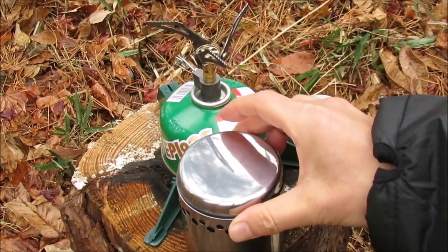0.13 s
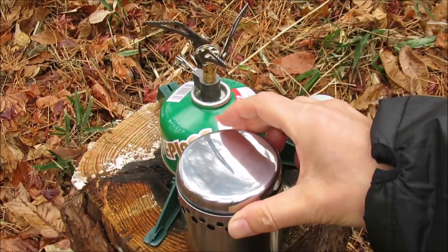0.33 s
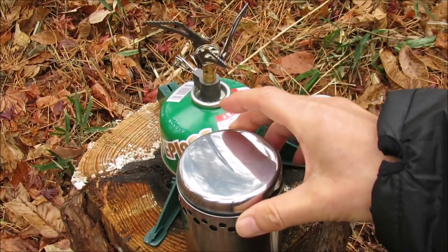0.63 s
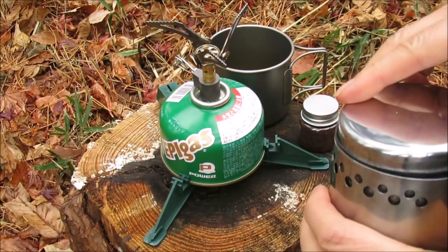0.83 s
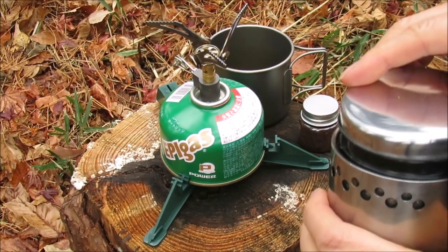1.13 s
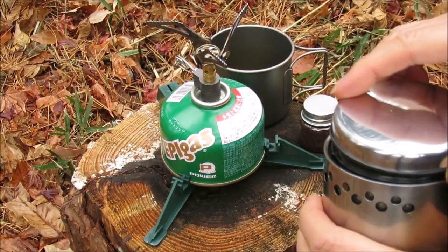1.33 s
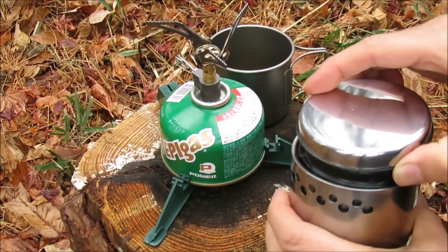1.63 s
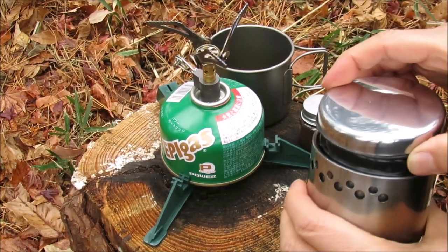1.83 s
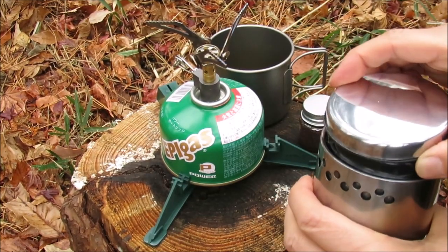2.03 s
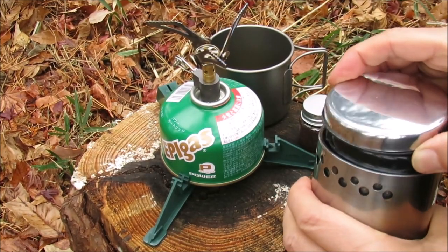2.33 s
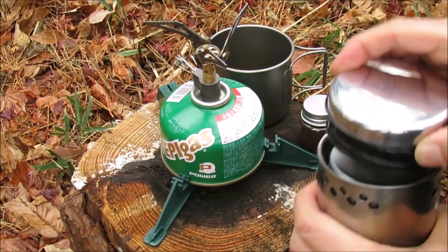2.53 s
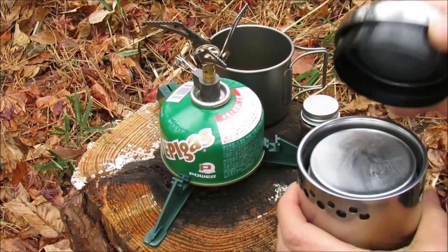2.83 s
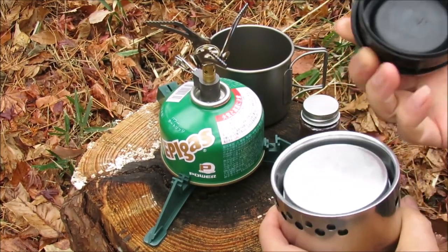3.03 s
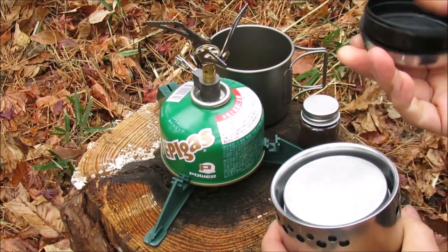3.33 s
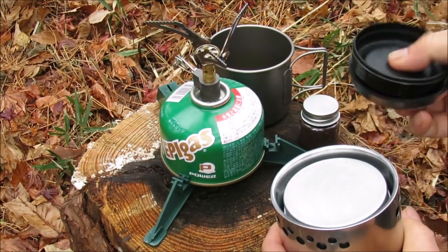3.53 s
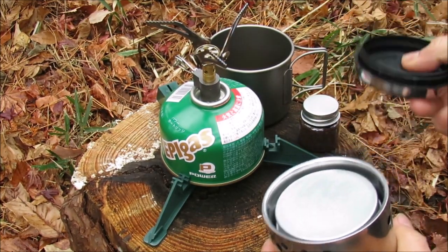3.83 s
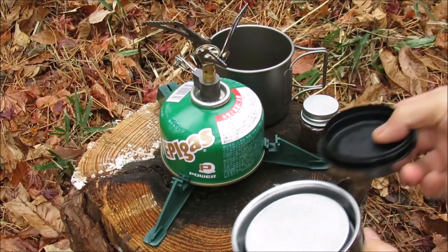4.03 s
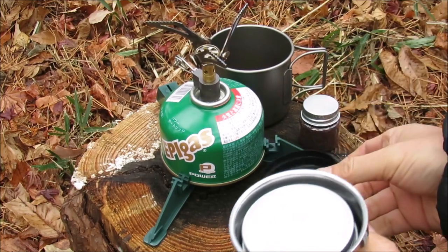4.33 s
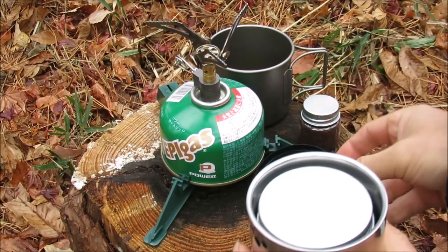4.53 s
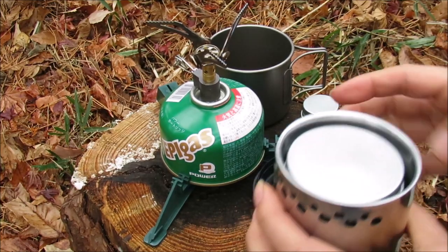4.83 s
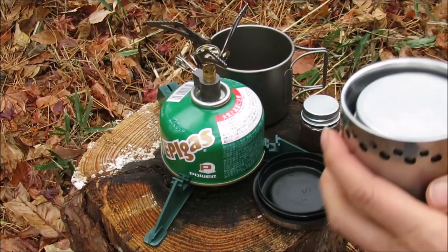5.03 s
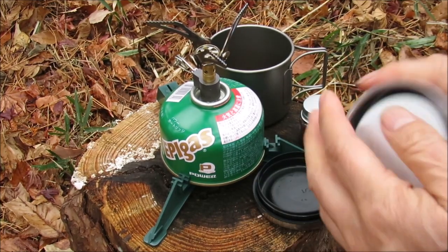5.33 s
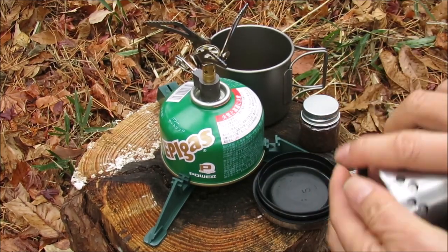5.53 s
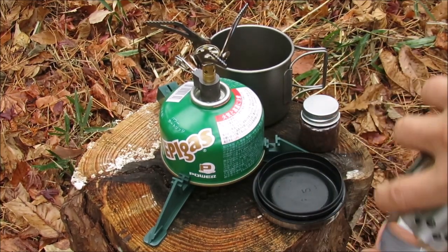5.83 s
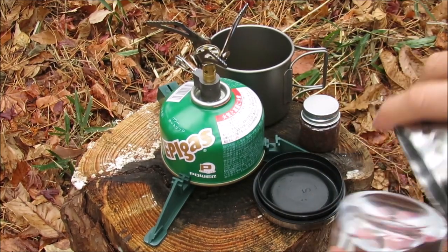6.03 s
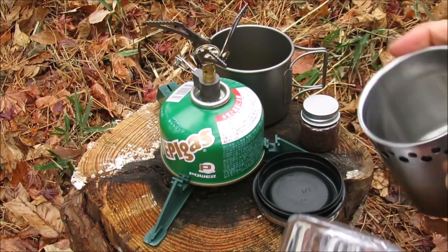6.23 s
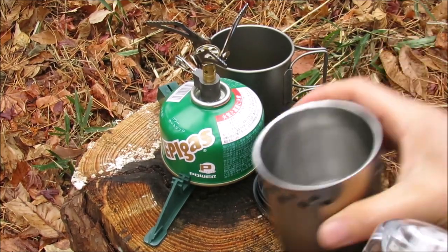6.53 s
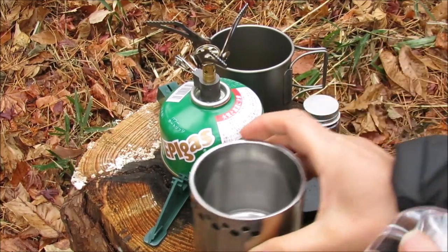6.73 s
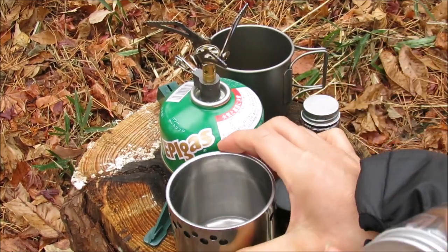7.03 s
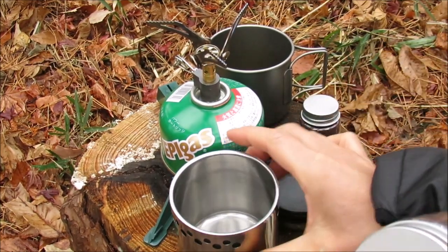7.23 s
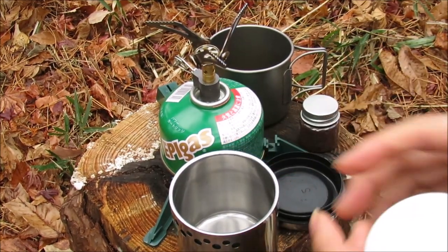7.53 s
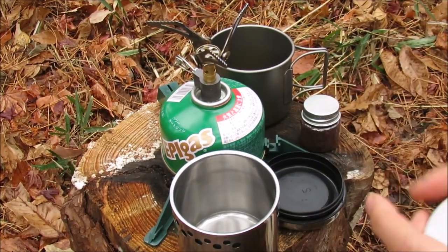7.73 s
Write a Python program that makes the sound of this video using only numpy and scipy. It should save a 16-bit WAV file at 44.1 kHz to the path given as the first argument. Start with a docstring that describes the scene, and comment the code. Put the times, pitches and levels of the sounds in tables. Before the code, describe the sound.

In a quiet wood with distant traffic rumble and sparse thin birdsong, hands open a metal mug right beside the microphone, slightly to the right. Faint taps and jacket rustle lead to crisp popping of a thin lid, two bright clacks as it is set down, then a hissy drag and a scatter of steel clinks. A hollow mug knock and small last clinks follow, nearly dry, with only faint echoes.

```python
"""Opening a steel camping mug in a wood

A thin lid is twisted off and pops as the thumb flexes it: bent panels and ringing modes, with cracks and thuds.
It is set on a stump; nested cups knock and slide apart: blows and slips on ringing steel, with treble hiss.
A nylon sleeve swishes in shaped noise; wavering whistles make far birds over a low wash of wind and traffic.
A camera close by hears the near sounds slightly to the right and turns down after loud sounds.
"""
import sys
import numpy as np
from scipy import signal
from scipy.fft import rfft, irfft, next_fast_len
from scipy.io import wavfile
from scipy.ndimage import uniform_filter1d

SR = 44100
rng = np.random.default_rng(int(sys.argv[2]) if len(sys.argv) > 2 else 0)


def wav_out(sig):
    """Save sig, one row per channel (or a flat mono array), as 16-bit PCM at SR to the path in sys.argv[1]."""
    wavfile.write(sys.argv[1], SR, np.round(np.clip(np.atleast_2d(sig).T, -1, 1) * 32767).astype(np.int16))


N = 347949  # length in samples

# How busily the arms and hands move: (t/s, sleeve swish level/dB)
MOVING = [(0, -60), (.6, -64.5), (1.2, -57.5), (1.4, -60), (1.6, -47), (1.85, -62.5), (2.35, -79),
          (2.57, -51.5), (2.75, -61.5), (2.95, -51), (3.2, -59.5), (3.702, -53), (3.949, -57), (4.5, -59.5),
          (5.05, -48.5), (5.45, -55.5), (5.75, -46.5), (6.0, -57), (6.42, -46.5), (6.8, -60.5), (7.3, -65),
          (7.62, -46), (7.89, -62.5)]
# Likeness of the left and right background noise: (f/Hz, likeness from -1 to 1)
SAME = [(60, 1), (130, 0.8), (290, 0.36), (640, -0.12), (1410, 0.11), (3100, -0.31), (6820, -0.54),
        (15000, -1.04)]
UPPER_PANEL = 1.61  # pitch of the second panel on knocks, as a ratio to the first


def gain_of(db):
    """Turns decibels into a plain multiplier."""
    return 10 ** (np.asarray(db) / 20)


def evened(x):
    """Scales a signal to an average strength (RMS) of one."""
    return x / np.sqrt(np.mean(x ** 2) + 1e-20)


def read(points, hz):
    """Reads a curve at any frequency, on a logarithmic frequency scale."""
    f, value = np.transpose(points)
    return np.interp(np.log(hz + 1), np.log(f + 1), value)


def level(curve):
    """Draws a gain over the whole scene from (t/s, level/dB) points."""
    return gain_of(np.interp(np.arange(N) / SR, *np.transpose(curve)))


def add(mix, s, sound):
    """Adds a sound into the mix, starting at s seconds."""
    part = mix[round(s * SR):][:len(sound)]
    part += sound[:len(part)]


def noise(colour, same, patchy_db, flicker_db, size=512):
    """Two channels of random short-time spectra with drifting patches and a flicker shared by all bands."""
    frames = 4 * N // size + 5
    hz = np.fft.rfftfreq(size, 1 / SR)
    a, b, c, d, patches = rng.standard_normal((frames, len(hz), 5)).T
    patches = uniform_filter1d(patches, size=8, axis=0)  # smooth over frequency
    patches = evened(uniform_filter1d(patches, size=10000 // size, axis=1))  # and over time
    flicker = evened(uniform_filter1d(rng.standard_normal(frames), size=3))
    likeness = np.clip(same(hz), -1, 1)[:, None]
    left = a + 1j * b
    right = likeness * left + np.sqrt(1 - likeness ** 2) * (c + 1j * d)
    spectra = np.array([left, right])
    spectra *= gain_of(read(colour, hz)[:, None] + patchy_db * patches + flicker_db * flicker)
    return evened(signal.istft(spectra, nperseg=size, noverlap=3 * size // 4)[1][:, :N])


def background_likeness(hz):
    """Makes low background noise alike on both sides and high noise more different or opposed."""
    return read(SAME, hz)


def scatter(x, t60, first):
    """Sparse taps of random sign, dying away; other taps in each channel."""
    taps = np.zeros((2, round(SR * .4)))
    at = np.arange(first, taps.shape[1] - 20, 20)
    at = at + rng.integers(0, 20, (2, len(at)))
    tap_gain = rng.choice([-1., 1.], at.shape) * gain_of(-60 * at / SR / t60)
    np.put_along_axis(taps, at, tap_gain, 1)
    return signal.fftconvolve(x[None], taps / np.linalg.norm(taps[0]), axes=1)[:, :N]


def from_right(x, lag, pan_db):
    """A source on the right reaches the left port later (lag in samples) and weaker."""
    size = next_fast_len(N)
    delay = np.exp(-2j * np.pi * np.fft.rfftfreq(size) * lag)
    late = irfft(rfft(x[0], size) * delay, size)[:N]
    return np.array([late * gain_of(pan_db / 2), x[-1] * gain_of(-pan_db / 2)])


def ringing(modes, hz, reach_db, bend=0, uneven_db=0):
    """An object rings freely, strongest in modes near hz; a grip that bends it detunes each mode."""
    t = np.arange(SR // 6) / SR
    mode_hz, mode_db, mode_t60 = np.array(modes).T[:, :, None]
    phase, shift, share = rng.uniform(-0.98, 1, (3, *mode_hz.shape))
    octaves_away = abs(np.log2(mode_hz / hz))
    near_db = mode_db - reach_db * octaves_away + uneven_db * share
    turns = mode_hz * (1 + bend * shift) * t + phase
    return (gain_of(near_db - 60 * t / mode_t60) * np.sin(2 * np.pi * turns)).sum(0)


def blows(rows, modes, reach_db, flex, crack_t60, crack_top_hz, rise, upper_db=-60, settle=99, **grip):
    """Each blow flexes two panels, rings the modes nearest its pitch, cracks in the treble and thuds."""
    # Hand and stump give under a blow: (f/Hz, level/dB, time to fall 60 dB/s)
    stump_modes = [(125, -11.5, 0.077), (210, -8.5, .04), (278, -1.5, .035), (404, -3, 0.016),
                   (556, -10, 0.024), (707, -10, 0.025)]
    linger_t60 = 0.054  # s; a flexed panel rings on at its own pitch
    out, t = np.zeros(N), np.arange(SR // 6) / SR
    treble = signal.butter(3, [2100, min(crack_top_hz, 16000)], "band", fs=SR, output="sos")
    for s, db, hz, upper_hz, crack_db, thud_db, linger_db, ring_db in rows:
        # the second panel slides towards the pitch of the first within about settle seconds
        upper_turns = hz * t + (upper_hz - hz) * settle * (1 - np.exp(-t / settle))
        first_panel = np.sin(2 * np.pi * hz * t)
        wave = first_panel + gain_of(upper_db) * np.sin(2 * np.pi * upper_turns)
        panel = (t * hz / flex * np.exp(1 - t * hz / flex)) ** 2 * wave  # swells for flex cycles
        linger = gain_of(linger_db - 60 * t / linger_t60) * first_panel
        thud = gain_of(thud_db) * ringing(stump_modes, hz, reach_db=0, bend=.08, uneven_db=3.0)
        hiss = evened(signal.sosfilt(treble, rng.standard_normal(len(t))))
        crack = gain_of(crack_db - 60 * t / crack_t60) * hiss
        ring = gain_of(ring_db) * ringing(modes, hz, reach_db, **grip)
        onset = (1 - np.exp(-t / rise)) ** 2
        add(out, s, gain_of(db) * (panel + onset * (ring + linger + thud + crack)))
    return out


def paired(rows, *more):
    """Gives each knock its second panel."""
    return [(s, db, hz, UPPER_PANEL * hz, *rest, *more) for s, db, hz, *rest in rows]


def scrapes(rows, modes, reach_db):
    """Uneven slips keep the metal ringing while it rubs; a separate grit sound adds bare grating."""
    out, body = np.zeros(N), signal.butter(2, [800, 7500], "band", fs=SR, output="sos")
    for s, length, db, hz, grit_db in rows:
        count = round(length * SR)
        rubbing = rng.standard_normal(count) * rng.exponential(1, count)
        rubbing *= signal.windows.tukey(count, .5)
        rung = signal.fftconvolve(rubbing, ringing(modes, hz, reach_db))
        add(out, s, gain_of(db) * evened(rung))
        add(out, s, gain_of(db + grit_db) * evened(signal.sosfilt(body, rubbing)))
    return out


def strokes(rows):
    """Each stroke of sound swells and fades; powers add."""
    power = np.zeros(N + SR)
    for s, length, db in rows:
        add(power, s - length / 2, gain_of(2 * db) * np.hanning(round(length * SR)) ** 2)
    return np.sqrt(power[:N])


def grainy(x, per_s, depth):
    """Gives a noise a rough grain: short random surges that fade quickly."""
    catches = (rng.random(N) < per_s / SR) * np.minimum(rng.exponential(1, N), 2)
    surges = signal.lfilter([1], [1, -np.exp(-1 / (0.0074 * SR))], catches)  # each fades over 7.4 ms
    return x * evened(1 + depth * surges)


def wood_air():
    """The steady broad background of the wood is random noise, strongest in the bass."""
    # Tone of the air: (f/Hz, relative level per Hz/dB)
    air_colour = [(12, -71.5), (20, -17), (53, -1.5), (177, -11.5), (234, -10.5), (270, -8.5), (377, -18),
                  (459, -16), (1190, -18.5), (1370, -18), (4420, -27), (12800, -42.5), (16000, -76.5)]
    air = noise(air_colour, background_likeness, patchy_db=1.5, flicker_db=.8, size=2048)
    return gain_of(-49.5) * air


def low_wash():
    """A low wash is noise mostly between 150 and 450 Hz that slowly rises and falls."""
    # Tone of the wash: (f/Hz, relative level per Hz/dB)
    wash_colour = [(60, -23.5), (150, -6.5), (300, 2), (450, 0), (600, -29.5), (1000, -53)]
    # Rise and fall: (t/s, level/dB)
    wash_level = [(0, -52.5), (1.25, -53), (1.45, -58.5), (2.2, -59), (3.1, -55), (3.8, -59.5), (4.6, -55),
                  (5.1, -60), (6, -53.5), (6.6, -58), (7.2, -60.5), (7.89, -59.5)]
    return level(wash_level) * noise(wash_colour, background_likeness, patchy_db=1.2, flicker_db=.4)


def traffic_rumble():
    """Distant traffic is a narrow deep noise around 50 Hz that slowly rises and falls."""
    # Tone of the rumble: (f/Hz, relative level per Hz/dB)
    rumble_colour = [(20, -25.5), (38, -9), (50, 8.5), (62, -10), (100, -10.5), (130, -28.5)]
    # Rise and fall: (t/s, level/dB)
    rumble_level = [(0, -54.5), (.7, -60), (1.3, -60), (2.2, -60), (2.7, -56), (3.8, -58.5), (4.7, -57),
                    (5.7, -51.5), (6.2, -50.5), (6.9, -61), (7.89, -53)]
    rumble = noise(rumble_colour, background_likeness, patchy_db=1.2, flicker_db=.6, size=4096)
    return level(rumble_level) * rumble


def birds():
    """Husky wavering whistles that fade, some with a tone an octave below, smeared by the trees."""
    # Bird notes: (t/s, length/s, start f/Hz, end f/Hz, level/dB, octave below relative to the note/dB)
    notes = [(0.152, 0.15, 3465, 3330, -58, -21), (0.487, 0.054, 3570, 3920, -53, -20),
             (0.523, 0.099, 3945, 4000, -48, -28), (0.601, .055, 3960, 4020, -52, -24),
             (.655, .095, 4030, 4010, -56, -20), (0.768, 0.13, 3990, 4020, -68, -26),
             (0.869, 0.058, 4700, 4600, -52, -3), (0.906, 0.033, 4510, 4360, -46, -21),
             (0.922, 0.092, 4190, 4190, -50, -18), (0.521, 0.16, 3630, 3730, -60.5, -30),
             (1.096, 0.021, 4200, 4210, -56, -20), (1.085, .035, 2830, 2790, -55, -23),
             (1.133, 0.09, 2880, 2730, -58, -20), (1.176, 0.036, 3700, 3580, -46.5, -16),
             (1.198, .014, 3630, 2800, -56, -20), (1.227, 0.054, 3740, 3760, -57, -20),
             (3.84, 0.019, 2920, 3470, -48, -10), (3.876, 0.12, 3020, 2980, -57, -20.5),
             (3.958, 0.092, 3230, 3040, -59, -21), (4.071, 0.072, 4090, 4520, -54.5, 0),
             (4.13, 0.039, 4470, 4580, -59, 4), (4.162, 0.039, 4520, 4450, -47.5, -26),
             (4.174, 0.064, 4200, 4170, -51.5, -23), (4.32, .06, 4210, 4200, -62.5, -24),
             (4.266, 0.11, 2940, 2750, -56, -18.5), (4.437, 0.038, 3400, 3280, -51, -18),
             (4.503, 0.047, 4870, 4630, -50, -3), (4.548, 0.068, 4730, 4500, -48.5, -4.5),
             (4.595, 0.099, 4340, 3990, -45, -15), (4.601, 0.046, 4470, 4260, -58, -23),
             (4.699, 0.094, 4300, 4200, -59, -25), (4.689, 0.082, 2890, 2730, -52.5, -7)]
    out = np.zeros(N)
    for s, length, start_hz, end_hz, db, under_db in notes:
        u = np.linspace(0, 1, round(length * SR))
        waver, husk = uniform_filter1d(rng.standard_normal((2, len(u))), size=160, axis=1)
        pitch = (start_hz + (end_hz - start_hz) * u) * (1 + .013 * evened(waver))
        turns = np.cumsum(pitch) / SR
        tone = np.sin(2 * np.pi * turns) + gain_of(under_db) * np.sin(np.pi * turns)
        fade_db = 4 * evened(husk) - 8 * u
        add(out, s, gain_of(db + fade_db) * tone * signal.windows.tukey(len(u), .3))
    return out + gain_of(1) * scatter(out, t60=.45, first=200)  # the trees answer


def sleeve():
    """A nylon sleeve swishes as the arms move: grainy noise that follows the movement."""
    # Tone of the swish: (f/Hz, relative level per Hz/dB)
    swish_colour = [(240, -43.5), (400, -4.5), (567, -9.5), (745, -8.5), (1270, -8.5), (2030, -12.5),
                    (2580, -9.5), (7930, -20.5), (15000, -38.5)]
    swish = noise(swish_colour, lambda hz: 0.58 + 0 * hz, patchy_db=2.5, flicker_db=-1.3)
    return level(MOVING) * grainy(swish, per_s=53.0, depth=0.32)


def treble_hiss():
    """Grainy treble noise swells in short bursts and longer drags over a hiss that follows the hands."""
    # Tone of the hiss: (f/Hz, relative level per Hz/dB)
    hiss_colour = [(2000, -26), (4000, -8.5), (6000, -10), (9000, -8.5), (12000, -2.5), (14500, -7),
                   (15600, -29)]
    # Short bursts of treble hiss, many of them together with knocks: (middle t/s, level/dB)
    hiss_bursts = [(.6, -59), (.97, -64), (1.16, -63), (1.503, -53), (2.57, -55), (3.04, -61), (3.42, -55),
                   (4.09, -55.5), (4.4, -55.5), (4.64, -53.5), (5.27, -50), (5.41, -50.5), (5.7, -51.5),
                   (5.89, -45.5), (6.09, -51), (6.19, -47), (6.28, -50), (6.42, -52), (6.52, -55),
                   (6.72, -61), (6.94, -53), (7.22, -59.5), (7.57, -52), (7.72, -59.5)]
    # The hand turns or pulls along the steel: (middle t/s, length/s, level/dB)
    drags = [(2.2, 1.5, -75), (2.954, 0.4, -53.5), (5.075, 0.39, -43), (5.7, 3.65, -59)]
    burst_s = 0.15
    s, db = np.transpose(MOVING)
    # skin on steel: -61.5 dB at the busiest; 1.5 dB weaker for each dB less movement
    grip = level(np.transpose([s, -61.5 + 1.5 * (db - db.max())]))
    amount = np.hypot(grip, strokes([(s, burst_s, db) for s, db in hiss_bursts] + drags))
    hiss = noise(hiss_colour, lambda hz: 0.34 + 0 * hz, patchy_db=2.5, flicker_db=2.0)
    return amount * grainy(hiss, per_s=79.0, depth=0.57)


def outer_mug():
    """The emptied outer mug knocks: its wall flexes and rings in low modes."""
    # Ringing modes: (f/Hz, level/dB, time to fall 60 dB/s)
    mug_modes = [(815, 1, .035), (897, -2, .06), (960, -5, .035), (1352, -4, .125), (1890, -19, .09),
                 (1965, -21, .09), (2680, -25, .07), (3255, -23, .08)]
    # Knocks: (t/s, level/dB, panel f/Hz, then relative to it: crack/dB, thud/dB, lingering panel/dB)
    mug_knocks = [(6.093, -35, 1340, -3, -18, -30), (6.149, -21, 780, -25, -4, -1.5),
                  (6.939, -17.5, 715, -33, -3, -19), (6.96, -38, 1900, -12, 8, -7),
                  (7.177, -29, 1090, -27, 1.5, -23), (7.182, -33, 890, -27, -1, -3),
                  (7.248, -46, 890, -7, -17, -12)]
    rows = paired(mug_knocks, -4.5)  # ring relative to the knock, dB
    return blows(rows, mug_modes, reach_db=1.5, flex=0.74, crack_t60=0.062, crack_top_hz=13500,
                 rise=0.0015, bend=.004, uneven_db=-0.5)


def inner_cup():
    """The nested cups knock and rub steel on steel, ringing the inner cup near each contact's pitch."""
    # Ringing modes: (f/Hz, level/dB, time to fall 60 dB/s)
    cup_modes = [(757, -10, .07), (890, -9, .04), (1160, -7, .05), (1470, -5, .05), (1930, -10, .05),
                 (2650, -12, .05), (3250, -16, .05), (4230, -5, .06), (5450, -17, .16), (5980, -7, .045),
                 (6700, -9, .05), (7400, -14, .07), (7950, -8, .04), (11500, -8, .025)]
    # Knocks: (t/s, level/dB, panel f/Hz, then relative to it: crack/dB, thud/dB, lingering panel/dB,
    # ring/dB, low where fingers damp the wall)
    cup_knocks = [(4.992, -35.5, 1830, 4, -2, -30, 5), (5.073, -29.5, 1200, -2, -2.5, -20, -6),
                  (5.084, -29, 1110, 1, -13, -14, -7), (5.113, -31.5, 2550, -18, -22, -17, -2),
                  (5.168, -36.5, 1500, -2, -10, -20, -5), (5.199, -29.5, 1410, -10, -11, -18, -5),
                  (5.369, -20.5, 1990, -9, -1.5, -11, 1), (5.38, -23.5, 1140, -11, -4, -8, -4),
                  (5.403, -30.5, 1490, -23, 1, -4, -1), (5.418, -35.5, 760, -18, -23, 0, 10),
                  (5.478, -23, 3080, 4, -6.5, -14, -3), (5.478, -23.5, 843, -36, -26, -5, -17),
                  (5.4785, -26, 1453, -30, -28, -0.5, -20), (5.541, -28, 1660, -39, -7, -8, -16),
                  (5.706, -32.5, 500, -1, 3, -22, -21), (5.897, -32.5, 8100, -4, -1.5, -26, 2.5),
                  (5.481, -46, 4150, -20, -18, 8, -10), (6.046, -23, 2320, 0, -17, -12, 2.5),
                  (6.0465, -14, 860, -18, -7.5, -13.5, -18), (6.054, -23, 790, -28, -3, 2, 3.5),
                  (6.265, -28, 5940, 4, -10, -15, -5.5), (6.423, -35, 1850, -34, -5, -20, -8),
                  (7.564, -28.5, 2390, -21, -3.5, -20, -9), (7.745, -44, 1230, -21, 6, -20, -5)]
    # Steel rubs on steel: (t/s, length/s, level/dB, favoured f/Hz, bare grit relative to it/dB)
    cup_scrapes = [(4.986, 0.17, -60, 1870, 4), (5.072, 0.022, -46.5, 1310, 0.5),
                   (5.374, 0.066, -59.5, 990, 8), (5.85, 0.24, -64, 5400, -30),
                   (6.169, 0.028, -58, 7340, -23)]
    knocks = blows(paired(cup_knocks), cup_modes, reach_db=10.0, flex=0.65, crack_t60=0.019,
                   crack_top_hz=14200, rise=0.00082, bend=0.0058, uneven_db=2.5)
    return knocks + scrapes(cup_scrapes, cup_modes, reach_db=72.0)


def lid():
    """Thin steel pops in the air with hardly a thud, knocks on mug or stump, and rings under the thumb."""
    # Ringing modes: (f/Hz, level/dB, time to fall 60 dB/s)
    lid_modes = [(435, -11.5, 0.027), (1057, -5, 0.037), (1300, -2, 0.013), (1680, 2.5, 0.021),
                 (1846, -2.5, 0.034), (2292, -6, 0.025), (3010, 4.5, 0.012), (3310, -7.5, 0.021),
                 (3950, -10, 0.025), (4450, -3, 0.02), (5140, -11, 0.02), (5960, -11, 0.03),
                 (6460, -18, 0.0492), (7600, -17, 0.011)]
    # The thumb flexes the lid: (t/s, level/dB, panel f/Hz, second panel f/Hz, crack relative to level/dB)
    lid_pops = [(3.032, -40, 1440, 1960, 4.5), (3.049, -36, 1180, 1920, -2),
                (3.065, -30.5, 1800, 2300, -20), (3.0916, -10, 2550, 2740, -5.5),
                (3.0922, -7.5, 1504, 2300, -34), (3.112, -30, 1880, 2500, -42),
                (3.116, -29, 1980, 2100, -34), (3.135, -20, 1950, 2250, -30), (3.146, -22, 2010, 2200, -35),
                (3.1494, -10.5, 2210, 1740, -16.5), (3.155, -31, 1120, 1860, -30),
                (3.159, -23.5, 1930, 2290, -22), (3.284, -21, 1910, 2670, -13.5),
                (3.299, -38, 1830, 2500, -28), (3.368, -26.5, 1640, 2150, -13.5),
                (3.446, -28, 1700, 2280, -7), (3.452, -13, 2050, 2600, -26), (3.459, -24, 1870, 2560, -6),
                (3.488, -33, 1960, 2440, -18), (3.551, -19.5, 1980, 2430, -15),
                (3.561, -15.5, 1485, 1830, -5), (3.578, -35, 1890, 2500, -8),
                (3.609, -30.5, 1820, 2400, -11.5), (3.635, -25.5, 1590, 3200, -7),
                (3.64, -35, 1690, 2200, -31.5), (3.646, -19.5, 1740, 2420, -13),
                (3.648, -14, 1470, 2230, -2), (3.6516, -6.5, 1720, 2110, -20.5),
                (3.6539, -5, 1313, 1650, -12.5), (3.699, -16.5, 1465, 3100, -14.5),
                (3.702, -28, 1610, 3120, -16), (3.705, -13.5, 1830, 1450, -18), (3.7097, 4, 1370, 1173, 0),
                (3.7119, 2, 1950, 1700, -24), (3.715, -23.5, 1340, 1900, -13.5),
                (3.865, -26.5, 1830, 2370, -9.5), (4.034, -35.5, 1615, 1950, -31)]
    # Knocks on mug or stump: (t/s, level/dB, panel f/Hz, then relative to it: crack/dB, thud/dB,
    # lingering panel/dB)
    lid_knocks = [(0.0197, -22.5, 870, -20, 0.5, -15), (.0215, -20.5, 1505, -8, -13, -3),
                  (.0275, -25.5, 1550, -13, 4, -3), (0.035, -27, 1430, -24, -5, -23),
                  (.041, -26, 4150, -16, -10, -17), (.935, -48, 1950, -20, -10, -12),
                  (.949, -41.5, 1280, -22, 3, -20), (1.233, -38, 1700, -30, -25, -2),
                  (1.244, -42.5, 1700, -3.5, -19, -20), (1.361, -42.5, 1760, -6, -22, -27),
                  (1.4, -48, 1800, -1, -22, -20), (1.655, -38.5, 1120, -30, -2, 1.5),
                  (2.557, -39, 1270, 11, 12, -20), (2.594, -35, 1150, 2.5, -8, -4),
                  (2.918, -42.5, 1350, -21, -6, -10), (4.364, -45, 1920, -20, -24, -20),
                  (4.402, -17.5, 1866, -7, -17.5, 0), (4.4025, -18.5, 1037, -30, -30, -1),
                  (4.414, -27, 1040, -3.5, -21, -12), (4.429, -27, 1060, -26, -23, -10),
                  (4.494, -32.5, 940, -14, -27, -28), (4.657, -12, 1765, -16, -20, -18),
                  (4.673, -19.5, 1250, -30, -40, -6), (4.676, -27, 1024, -12, -16, 1)]
    # The thumb rubs the lid: (t/s, length/s, level/dB, favoured f/Hz, bare grit relative to it/dB)
    lid_rubs = [(2.54, 0.037, -53, 1290, -3), (2.568, 0.043, -59, 1500, -11),
                (3.03, 0.059, -55.5, 1210, -4), (3.097, 0.037, -47, 1850, -25),
                (3.134, 0.031, -48, 1080, -22), (3.152, 0.018, -48, 1850, -20),
                (3.42, 0.063, -54.5, 1900, -1), (3.565, 0.049, -61, 1700, 2),
                (3.712, 0.024, -37.5, 1900, 11.5), (4.403, 0.026, -41.5, 1780, -17),
                (4.658, 0.023, -38.5, 1700, -15)]
    thud_db, linger_db = -32, -16.5  # relative to each pop
    thin = dict(crack_t60=0.015, crack_top_hz=13440, rise=0.00035, bend=.02, uneven_db=4.0)
    pop_rows = []
    for s, db, hz, upper_hz, crack_db in lid_pops:
        ring_db = -12 - 0.18 * db  # hard pops ring relatively less
        pop_rows.append((s, db, hz, upper_hz, crack_db, thud_db, linger_db, ring_db))
    knock_rows = paired(lid_knocks, -2.5)  # ring relative to the knock, dB
    pops = blows(pop_rows, lid_modes, reach_db=5.0, flex=1.91, upper_db=-2.5, settle=0.0041, **thin)
    knocks = blows(knock_rows, lid_modes, reach_db=4.0, flex=1.06, upper_db=-9.5, **thin)
    return pops + knocks + scrapes(lid_rubs, lid_modes, reach_db=21.0)


def scene():
    """Places the near sounds slightly to the right, over the wood, wash, traffic and birds."""
    background = wood_air() + low_wash() + traffic_rumble() + birds()
    hits = outer_mug() + inner_cup() + lid()
    # small things send out no deep bass
    hits = signal.sosfilt(signal.butter(2, 130, "high", fs=SR, output="sos"), hits)
    near = hits + gain_of(-20.0) * scatter(hits, t60=0.11, first=60)  # faint scattered echoes
    near += sleeve() + treble_hiss()
    return background + from_right(near, lag=1.14, pan_db=-1.3)


def record(dry):
    """The capsule dulls the top treble; gain drops on loud sounds and creeps back; peaks flatten."""
    dry = signal.sosfilt(signal.butter(4, 14800, fs=SR, output="sos"), dry)
    power_db = 10 * np.log10(abs(uniform_filter1d((dry ** 2).mean(0), size=200)) + 1e-12)
    fall = np.arange(N) * 30.6 / SR  # the held level falls by 30.6 dB a second
    held_db = np.maximum.accumulate(power_db + fall) - fall
    over_db = np.maximum(held_db + 23.5, 0)  # excess above -23.5 dB
    smooth_over_db = signal.lfilter([1 / 300], [1, 1 / 300 - 1], over_db)
    ducked = dry / gain_of(0.33 * smooth_over_db)  # takes off a third of the excess
    flattened = np.clip(ducked, -1, 1)
    band_limit = signal.firwin(511, 16400, window=("kaiser", 9), fs=SR)
    return signal.oaconvolve(flattened, band_limit[None], "same")


dry = scene()
out = record(dry)
wav_out(out)
```